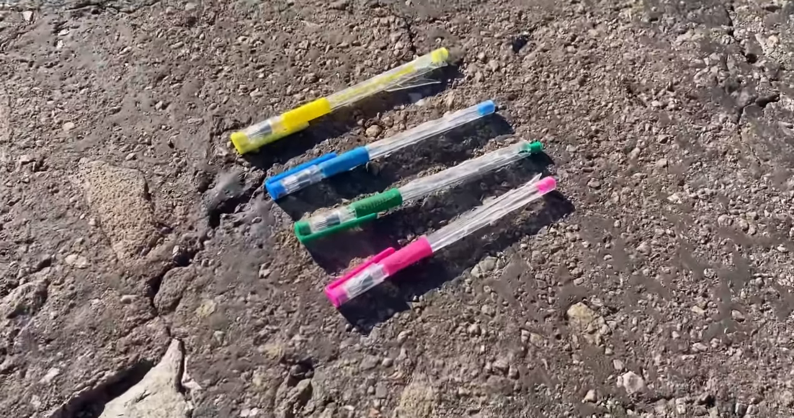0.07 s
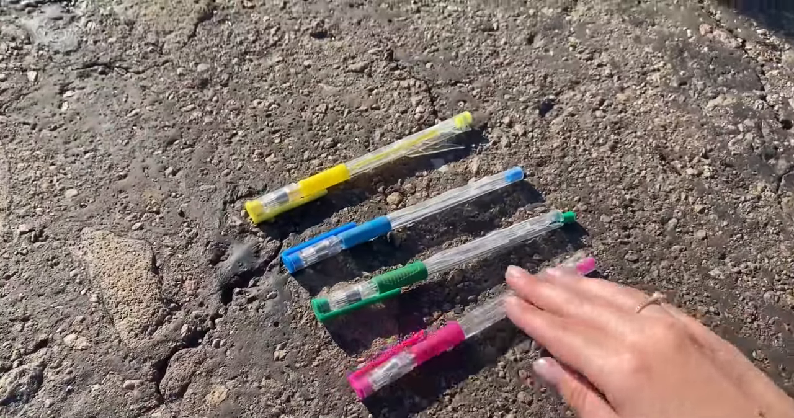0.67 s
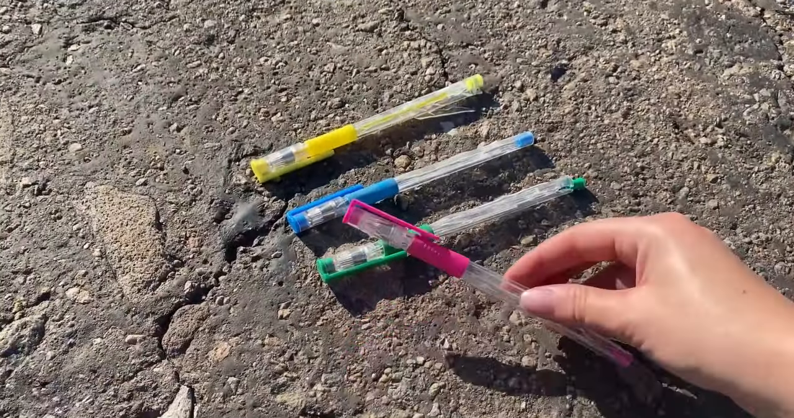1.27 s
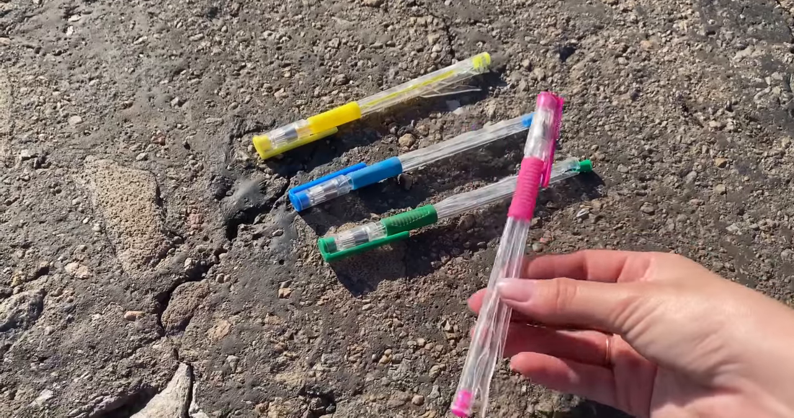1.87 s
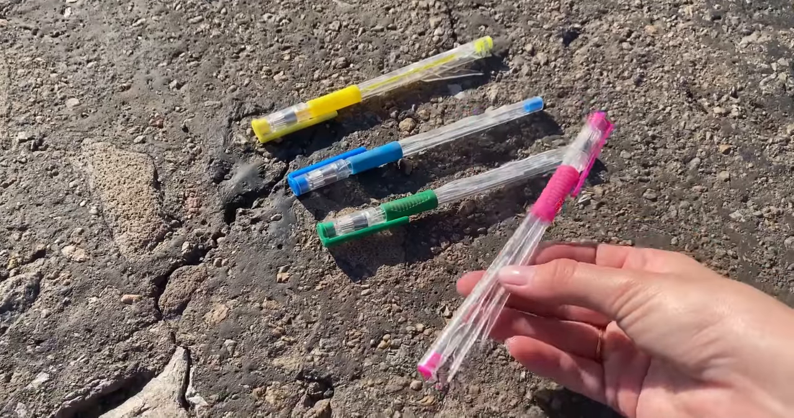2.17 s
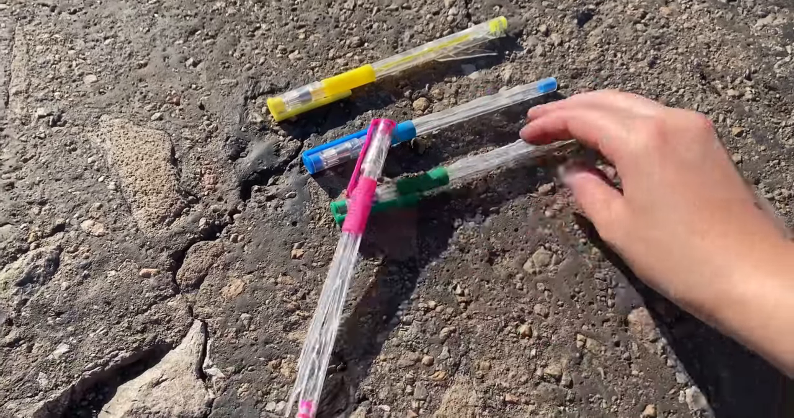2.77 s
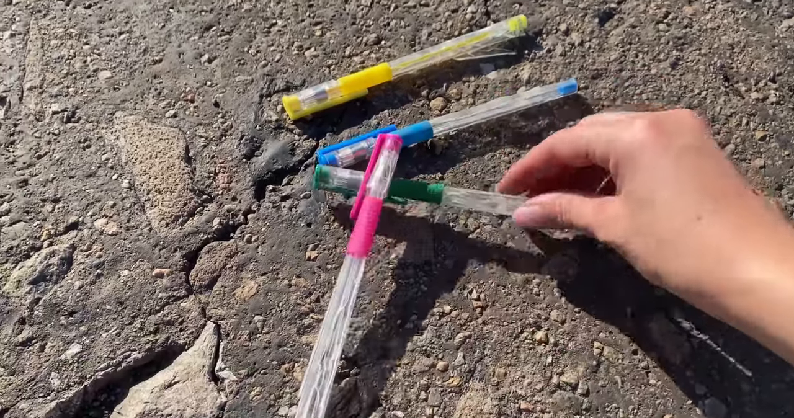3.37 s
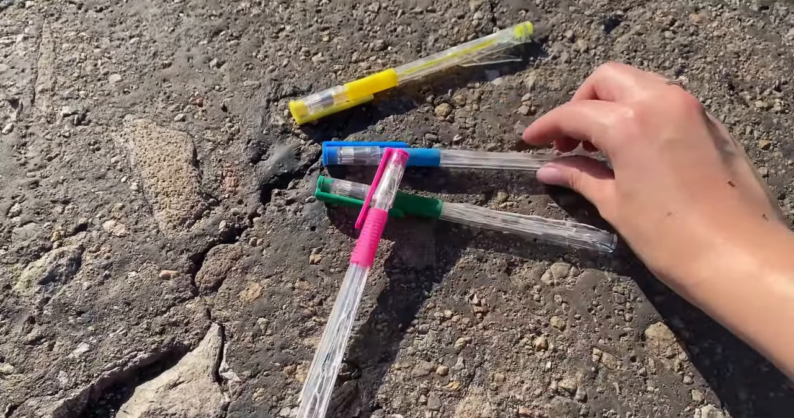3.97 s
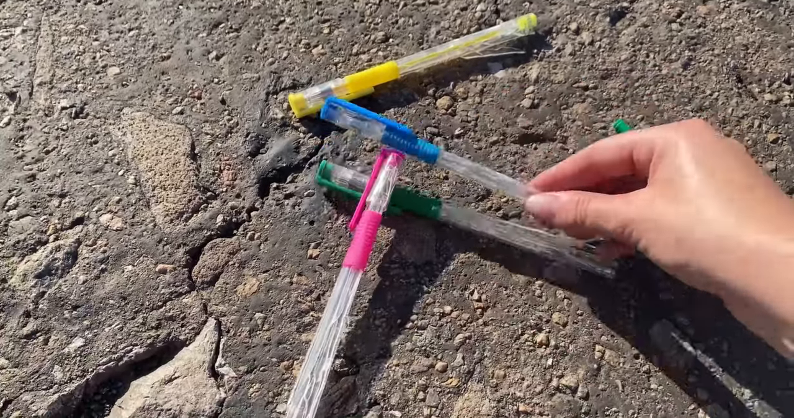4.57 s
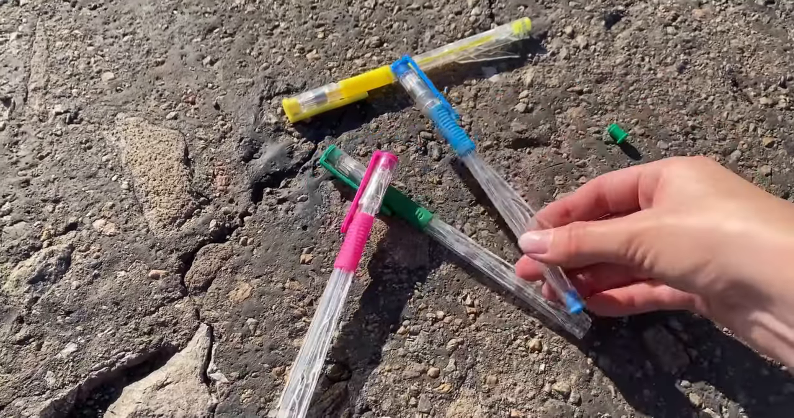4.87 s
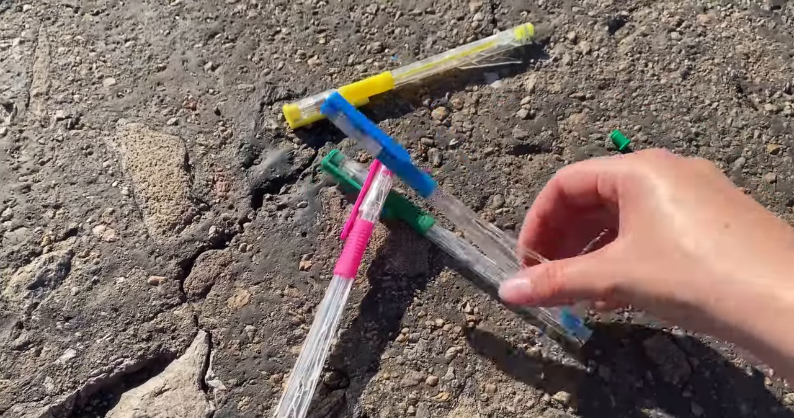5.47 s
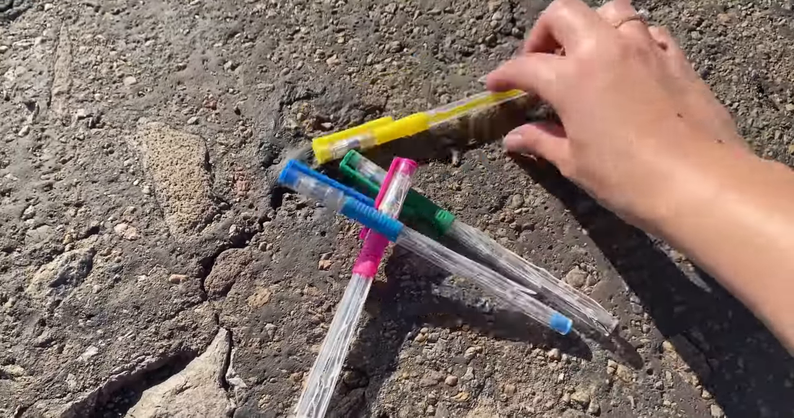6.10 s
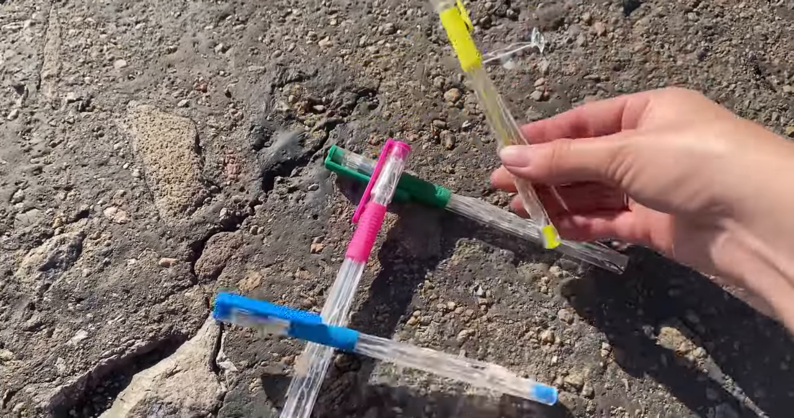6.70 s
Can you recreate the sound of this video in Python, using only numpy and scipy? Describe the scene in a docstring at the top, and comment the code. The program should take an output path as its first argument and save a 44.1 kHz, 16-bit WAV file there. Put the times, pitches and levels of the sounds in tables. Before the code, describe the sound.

Close, hollow ticks and short gritty scrapes of plastic pens being picked up and dropped on pavement outdoors, over a faint breeze.

```python
"""Light wind puffs at a phone's microphone, outdoors, over a distant drone and a thin hiss. Then, close by, a
hand drags, lifts and drops plastic pens on rough asphalt. The hollow barrels tick against grit and each other,
chatter as they catch on grains of stone, ring when let go, and their caps snap shut. The wind is small eddies
of air striking the microphone's openings; the hand holding the phone adds three soft bumps."""
import sys
import numpy as np
from scipy import signal
from scipy.fft import rfft, irfft
from scipy.io import wavfile
from scipy.ndimage import uniform_filter1d

SR = 44100
rng = np.random.default_rng(int(sys.argv[2]) if len(sys.argv) > 2 else 0)


def to_wav(s):
    """Save 16-bit WAV."""
    ch = np.atleast_2d(s).T  # columns
    pcm = np.round(np.clip(ch, -1, 1) * 32767)  # PCM
    wavfile.write(sys.argv[1], SR, pcm.astype(np.int16))


N = 297145
TIME, FREQ = np.arange(N) / SR, np.fft.rfftfreq(N, 1 / SR)


def gain_of(db):
    return 10 ** (np.asarray(db) / 20)


def unit_rms(x):
    return x / np.sqrt(np.mean(x ** 2) + 1e-20)


def unit_energy(x):
    return x / np.sqrt(np.sum(x ** 2, -1, keepdims=True) + 1e-20)


def curve_at(points, hz):
    f, value = np.transpose(points)
    return np.interp(np.log(hz + 1), np.log(f + 1), value)


def add(mix, start, sound):
    part = mix[:, max(round(start * SR), 0):][:, :sound.shape[1]]
    part += sound[:, :part.shape[1]]


def band(x, lo, hi, order=2):
    """Keeps lo to hi Hz; a higher order gives steeper edges."""
    f = np.fft.rfftfreq(x.shape[-1], 1 / SR) + 1
    return irfft(rfft(x) / (1 + (lo / f) ** (2 * order)) / (1 + (f / hi) ** (2 * order)), x.shape[-1])


def stereo_noise(count, likeness):
    a, b = rng.standard_normal((2, count))
    return np.array([a, likeness * a + np.sqrt(1 - likeness ** 2) * b])


def panned(x, left_db):
    return x * gain_of(np.array([[left_db], [-left_db]]) / 2)


def uneven_delays(gap_s, count, jitter=0.25):
    return gap_s * (np.arange(count) + jitter * rng.uniform(-1, 1, count) * (np.arange(count) > 0))


# The wind between gusts: (time [s], relative level [dB], rough lowest pitch [Hz])
BREEZE = [(0, -52, 280), (0.11, -49, 274), (0.165, -74, 350), (0.23, -71, 336), (0.31, -54, 316),
          (0.62, -56, 345), (0.95, -53.5, 263), (1.25, -55.5, 183), (1.6, -55.5, 270), (1.88, -62, 310),
          (2.1, -70.5, 426), (2.53, -77, 346), (2.66, -56, 195), (2.82, -55, 418), (3.3, -62.5, 268),
          (3.47, -63.5, 290), (3.54, -48.5, 290), (3.68, -53.5, 280), (3.76, -68, 280), (3.85, -62, 304),
          (4.6, -56, 231), (5.1, -72, 233), (5.5, -58.5, 166), (5.72, -55, 282), (6.05, -63, 287),
          (6.22, -61, 155), (6.74, -57, 130)]


def breeze(lumpy_db=3.5):
    """Moving air flutters at the microphone as a low, lumpy rumble."""
    lumps = unit_rms(band(rng.standard_normal(N), 9.7, 46))
    rumble = unit_rms(band(stereo_noise(N, 0.78), 63, 720) * gain_of(lumpy_db * lumps))
    times, db, _ = np.transpose(BREEZE)
    return rumble * gain_of(np.interp(TIME, times, db) - 2)


def thin_bass(x, floor_db=-36):
    """Turns the bass down steeply below a pitch that wanders."""
    hz, frame_times, spectra = signal.stft(x, SR, nperseg=2048, noverlap=1792)
    times, _, lowest_hz = np.transpose(BREEZE)
    edge_hz = 0.99 * np.interp(frame_times, times, lowest_hz)
    keep = 1 / (1 + (edge_hz / (hz[:, None] + 1)) ** 18) + gain_of(floor_db)
    return signal.istft(spectra * keep, SR, nperseg=2048, noverlap=1792)[1][:, :N]


# Puffs of wind: (start [s], length [s], relative level [dB], pitch before lowering [Hz])
GUSTS = [(0.02, .02, -47, 500), (0.05, .02, -41, 537), (0.072, .02, -38.5, 604), (0.091, .02, -38.5, 710),
         (0.138, .02, -40, 420), (0.219, .02, -52, 990), (0.254, .02, -48.5, 486), (0.313, .066, -43, 483),
         (0.324, .044, -42, 454), (0.402, .055, -45, 520), (0.473, .02, -39.5, 520),
         (0.501, .088, -45, 453), (0.732, .09, -52.5, 537), (1.247, .02, -44, 398),
         (1.271, .02, -44.5, 402), (1.34, .02, -47.5, 500), (1.593, .02, -40.5, 500),
         (1.709, .033, -48.5, 480), (1.872, .08, -45.5, 605), (2.011, .04, -48.5, 590),
         (2.124, .02, -45, 505), (2.391, .02, -45.5, 516), (2.714, .066, -47, 665), (3.014, .02, -45, 520),
         (3.188, .02, -43.5, 480), (3.512, .066, -43, 523), (3.66, .02, -41, 525), (3.887, .066, -43, 510),
         (4.719, .044, -47.5, 455), (4.821, .066, -48, 495), (4.998, .044, -46.5, 450),
         (5.237, .02, -42, 378), (5.618, .02, -44, 416), (5.765, .02, -46, 447), (5.815, .044, -41, 404),
         (6.273, .066, -48, 300), (6.524, .02, -47, 296)]


def gusts(eddy_s=0.0071, gap_s=0.021, spread_db=2, lowering=0.76):
    """Each gust is one or a few small swirls of air (eddies) striking the microphone."""
    out, t = np.zeros((2, N)), np.arange(-1024, 1024) / SR
    for start, length, db, hz in GUSTS:
        for delay in uneven_delays(gap_s, count=5):
            noise = band(stereo_noise(len(t), 0.047), hz * lowering, hz * lowering)
            eddy = unit_energy(noise * np.exp(-(t / eddy_s) ** 2)) * np.sqrt(eddy_s * SR)
            strength = gain_of(db - spread_db * rng.standard_normal())
            if delay == 0 or delay + gap_s / 2 < length:
                add(out, start + delay + t[0], strength * eddy)
    return out


# The tone colour of the far background: (pitch [Hz], relative level [dB])
AIR_COLOUR = [(200, -29), (380, -1.5), (660, -7), (900, -8), (1190, -15), (1450, -5.5), (1950, -8),
              (2120, -10), (2400, -7), (2920, 0.5), (3150, -3.5), (3450, -3), (4400, -3.5), (6800, -10.5),
              (8000, -23.5), (12000, -29), (15500, -39.5)]
# Pitches that stand out in it: (pitch [Hz], width [Hz], boost [dB])
DRONE_HUMPS = [(339, 37, 3), (778, 40, 8.5), (871, 60, 6), (1056, 39, 6), (1580, 26, 2.5), (1648, 67, 9),
               (1906, 104, 8)]
# Which side it leans to: (pitch [Hz], left over right [dB])
AIR_PAN = [(200, -19), (400, 0.5), (750, 7), (1300, 13), (1900, -1), (2500, 0), (4400, 4), (6500, 1),
           (8500, 25.5)]
# How loud it is: (time [s], relative drone level [dB], relative hiss level [dB])
AIR_LEVEL = [(0, -61, -63), (1.0, -60.5, -62), (2.3, -61, -64.5), (3.1, -59, -63), (5.0, -60, -65.5),
             (6.0, -59, -62.5)]


def distant_drone():
    """Noise from far away: a low drone under a thin hiss."""
    humps_db = sum(db / (1 + (2 * (FREQ - hz) / width) ** 2) for hz, width, db in DRONE_HUMPS)
    sides_db = np.array([[0.5], [-0.5]]) * curve_at(AIR_PAN, FREQ)
    colour = gain_of(curve_at(AIR_COLOUR, FREQ) + humps_db + sides_db)
    air = irfft(rfft(stereo_noise(N, 0.5)) * colour, N)
    drone = band(air, 1, 2290, order=4)
    times, drone_db, hiss_db = np.transpose(AIR_LEVEL)
    drone_gain = gain_of(np.interp(TIME, times, drone_db) + 1) / band(air, 840, 2600, order=4).std()
    hiss_gain = gain_of(np.interp(TIME, times, hiss_db) + 1) / band(air, 2200, 9300, order=4).std()
    return drone * drone_gain + (air - drone) * hiss_gain


def wavering(x, patchy_db=2, dip_db=0.7):
    """Patches of pitch grow louder and softer while the whole sound dips and swells a little."""
    spectra = signal.stft(x, SR, nperseg=512, noverlap=384)[2]
    patches = uniform_filter1d(rng.standard_normal(spectra.shape[1:]), size=7, axis=0)
    patches = unit_rms(uniform_filter1d(patches, size=24, axis=1))
    dips = unit_rms(uniform_filter1d(rng.standard_normal(spectra.shape[2]), size=25))
    spectra *= gain_of(patchy_db * patches - dip_db * dips)
    return signal.istft(spectra, SR, nperseg=512, noverlap=384)[1][:, :N]


# Thin tones in the drone: (pitch [Hz], typical level [dB])
HUM_TONES = [(781, -71), (862, -78.5), (1057, -74.5), (1502, -79), (1661, -71), (1918, -74), (4016, -74.5)]


def hum(waver_db=3, drift_hz=1.78):
    """A few lasting tones from far off, wavering a little on their way."""
    out = np.zeros((2, N))
    for hz, db in HUM_TONES:
        pitch = hz + drift_hz * unit_rms(band(stereo_noise(N, 0), 0.44, 5.08))
        waver = unit_rms(band(rng.standard_normal(N), 0.49, 9.4))
        out += gain_of(db + waver_db * waver) * np.sin(2 * np.pi * np.cumsum(pitch, axis=1) / SR)
    return panned(out, left_db=3)


# The tones of a hollow pen barrel: (pitch [Hz], relative level [dB], time to fade by 60 dB [s])
BARREL_TONES = [(1330, -0.5, 0.06), (2537, 10, 0.083), (3480, 15, 0.063), (4060, -9, 0.13),
                (4110, 10, 0.04), (4800, -6.5, 0.093), (5500, -1, 0.028), (6600, 11.5, 0.059),
                (9030, 24, 0.027), (9940, 23, 0.012), (12700, 9.5, .025), (14100, 22.5, 0.021)]


def barrel_ring(t, vary_db=4, detune=0.028):
    """The barrel rings with a new mix of tones each time, as where it is touched and held varies."""
    hz, db, fade_s = np.transpose(BARREL_TONES)[:, :, None]
    hz = hz * (1 + detune * rng.uniform(-1.39, 1, hz.shape))
    db = db + vary_db * rng.standard_normal(db.shape)
    phase = 2 * np.pi * (rng.random(hz.shape) + 0.72 * rng.random((2,) + hz.shape))
    tones = gain_of(db - 60 * t / fade_s) * np.sin(2 * np.pi * hz * t + phase)
    return unit_energy(tones.sum(1))


def barrel_note(t, hz, fade_s, upper_ratio, upper_db):
    """A barrel's main note and one higher tone, dying away together."""
    phase = 2 * np.pi * (rng.random() + 0.96 * rng.random((2, 1)))
    main = np.sin(2 * np.pi * hz * t + phase)
    upper = gain_of(upper_db) * np.sin(2 * np.pi * upper_ratio * hz * t + phase)
    onset = (1 - np.exp(-t * hz / 2)) ** 2
    return unit_energy((main + upper) * onset * gain_of(-60 * t / fade_s))


LEAD_IN_SAMPLES = 256  # a faint, quick swell of noise softens the start of each click


def contact(db, body_db, crack_db, top_hz, ring_db, hz, strike_s=0.00021, scatter_s=0.003):
    """One touch: a faint lead-in, a sharp strike, a scatter off ground and hand, and a plastic ring."""
    t = np.arange(2048) / SR
    strike = unit_energy(stereo_noise(len(t), 0.3) * t * np.exp(-t / strike_s))
    scatter_shape = np.exp(-t / scatter_s) * (1 - np.exp(-t / strike_s))
    scatter = unit_energy(stereo_noise(len(t), 0.04) * scatter_shape)
    hit = unit_energy(strike + gain_of(ring_db) * (scatter + gain_of(-6) * barrel_ring(t)))
    rise = np.exp(-t[:LEAD_IN_SAMPLES][::-1] / 0.001)
    lead_in = gain_of(-15) * unit_energy(stereo_noise(LEAD_IN_SAMPLES, 0.18) * rise)
    hit = np.hstack([lead_in, hit])
    note = barrel_note(t, hz, fade_s=0.013, upper_ratio=2.15, upper_db=-11)
    note = np.pad(note, ((0, 0), (LEAD_IN_SAMPLES, 0)))
    note *= gain_of(-2 + 0.55 * ring_db)  # the freer the barrel rings, the more its note stands out
    body = gain_of(body_db - 1) * unit_energy(band(hit, 850, 4450, order=3))
    clack = unit_energy(unit_energy(band(hit, 3900, 7640, order=5)) + note)
    treble = band(hit, 8250, 16000, order=8)
    crack = gain_of(crack_db) * unit_energy(band(treble, 1, top_hz, order=3))
    return gain_of(db) * np.sqrt(0.004 * SR) * (body + clack + crack)


# Pen knocks: (time [s], level [dB], low body [dB], high crack [dB], top of the crack [Hz],
# ring [dB], barrel note [Hz], bounces [count]). Body, crack and ring are relative levels.
CLICKS = [(0.632, -44.5, -13, -7, 16000, 17, 4100, 0), (0.658, -48.5, -14, -6, 16000, 0, 5840, 0),
          (0.6849, -50, -2, -8, 14000, 4, 3990, 0), (0.6938, -37, -8.5, -8.5, 17000, -1, 3420, 0),
          (0.727, -47, -17, 0, 17000, -6, 6160, 0), (0.733, -46.5, -2, -3, 17000, -5, 3910, 0),
          (0.7516, -46, -9, -1, 16000, -4, 3990, 0), (0.7583, -49, -13, -3, 17000, -1, 3880, 0),
          (0.7678, -50, -8, -2, 16000, -3, 3980, 0), (0.774, -46, -6, -4, 16000, 6, 3900, 0),
          (0.778, -47, -13, -3, 16000, 0, 4110, 0), (0.7889, -42, -14, -2, 16000, -7, 3950, 0),
          (0.807, -41, -11, -5, 17000, 4, 3830, 0), (0.8364, -44, -10, -4, 16000, 4, 4000, 0),
          (0.8468, -43.5, -11, -3, 16000, 0, 4800, 1), (0.877, -44.5, -5, -8, 16000, 8, 4100, 0),
          (0.893, -48, -2, -7, 16000, 3, 3900, 0), (0.9185, -42.5, -8, -10, 16000, 4, 3960, 1),
          (1.0234, -41, -6, -4.5, 16000, 1, 5280, 0), (1.045, -43, -8, -18, 15000, 5, 5050, 0),
          (1.052, -40, -8, -7, 16000, 3, 5020, 2), (1.309, -53, -12, -11, 16000, -1, 4820, 0),
          (1.391, -47.5, -19, 3.5, 18000, -7, 4940, 0), (1.696, -45, -6.5, -11, 13000, 24, 4060, 0),
          (2.3178, -50.5, -6, -15, 14000, 13, 4300, 0), (2.3294, -46, 1.5, 7, 16000, 0, 6370, 0),
          (2.379, -41.5, -10, -4, 17200, 12, 4090, 0), (2.3818, -47.5, -10, -4.5, 17000, 10, 4430, 0),
          (2.406, -52.5, -15, -6, 14100, 8, 5400, 1), (2.4306, -46.5, -7, -5.5, 13000, 9, 4180, 2),
          (2.541, -40.5, -4, 4, 16900, 0, 4100, 0), (2.5448, -38.5, -7, 3.5, 16900, 4, 4040, 2),
          (2.592, -47, -6, -1, 16000, 8, 4770, 0), (2.606, -47, -1.5, -2, 14000, -6, 5400, 0),
          (2.6572, -34, -6.5, 3, 18000, -1, 5300, 0), (2.6625, -42, -13, 5, 18000, 5, 4500, 0),
          (2.667, -40.5, -19, 3, 18000, 13, 4520, 0), (2.678, -46.5, -12, 9, 18000, -9, 4500, 0),
          (2.7139, -45, -12, 7.5, 15000, 6, 4650, 0), (2.716, -46.5, -15, -4, 16000, 6, 4500, 0),
          (2.7238, -45.5, -12, -3, 16000, 9, 4500, 0), (2.734, -53, -17, -1, 14000, 5, 4300, 1),
          (2.7506, -49.5, -16, -5, 14000, 3, 8500, 0), (2.834, -54, 0, 6, 15000, -4, 7300, 0),
          (2.89, -48.5, 3, 9.5, 14900, 1, 4800, 1), (2.901, -48, -2, 5, 13000, 4, 4700, 0),
          (2.922, -47, 1, 5.5, 16000, -2, 4460, 0), (2.951, -52, -3, -5, 14000, 2, 4600, 0),
          (2.988, -56, 2, 7.5, 13000, -8, 6900, 0), (3.0686, -50.5, 2.5, -6, 15000, -2, 4760, 0),
          (3.083, -60, -4, 0, 15000, -3, 4760, 0), (3.2658, -41, -10, -12, 15000, 0, 5930, 0),
          (3.27, -44.5, 0.5, 4, 15000, 3, 4720, 1), (3.2872, -49.5, 0, 1, 14000, 2, 4800, 0),
          (3.408, -48, -18, -1.5, 13000, 10, 3980, 0), (3.46, -48.5, -9, -8, 17000, 5, 5540, 0),
          (3.473, -55, -3, -2, 14000, 2, 5500, 0), (3.48, -57, -4, 8, 17000, 0, 5500, 0),
          (3.539, -60, -9, 9, 17000, 5, 7000, 0), (3.5557, -37, -2, 2, 14000, -4, 4760, 0),
          (3.571, -49.5, -10, 0, 18000, -8, 7340, 0), (3.6063, -48.5, 0, 1.5, 15100, -1, 4050, 0),
          (3.8107, -43, -7, -6, 14000, 15, 3900, 0), (3.818, -37, -5, -11, 13000, 6, 3760, 0),
          (3.834, -47, -15, 4, 13000, 10, 3670, 1), (3.845, -52, 4, 1, 12000, -19, 3960, 0),
          (3.8684, -42.5, -27, -0.5, 11500, 10, 3900, 0), (3.8807, -45.5, -3.5, -5, 11500, 7, 3940, 0),
          (3.902, -42.5, -20, -0.5, 12900, -1, 4040, 0), (3.9212, -52, -4, -5, 12000, -1, 3950, 0),
          (4.026, -62.5, 5, 5.5, 18000, -5, 3900, 0), (4.079, -53.5, -5, -6, 14000, 6, 3900, 0),
          (4.1691, -41.5, -16, -7, 17000, 8, 3900, 0), (4.187, -55, -12, -1, 14000, 2, 3970, 0),
          (4.2191, -55, 5.5, 2, 17000, -11, 4930, 0), (4.387, -47.5, -30, -3.5, 14000, 2, 7800, 0),
          (4.4358, -48, -0.5, 4.5, 12600, -4, 5500, 0), (4.6615, -43, -4, -7, 12000, 2, 6500, 0),
          (4.6755, -57, -14, -1, 15000, 0, 7000, 0), (4.681, -58, -12, -4.5, 15000, 2, 7000, 0),
          (4.8425, -58, -15, 0.5, 15000, -3, 7000, 1), (4.864, -57.5, -10, -3, 15000, 0, 6740, 0),
          (4.943, -61, -12, -1, 16000, 0, 8000, 0), (5.4725, -34, -16, -10.5, 17000, 17, 4650, 0),
          (5.542, -38, -7.5, 4.5, 14000, 2, 6420, 0), (5.5433, -38.5, -9, -1, 14000, 3, 4750, 0),
          (5.5475, -38, -13, 5, 14000, 3, 5080, 0), (5.559, -50, -1, -1, 14000, -2, 4200, 0),
          (5.6116, -54, -10, -3, 14000, 2, 6600, 0), (5.715, -47.5, -5, -10, 14000, 8, 4200, 0),
          (5.7294, -49, -11, -13, 14000, 3, 4200, 0), (5.6871, -31.5, -11.5, -7, 12500, 13, 4150, 0),
          (5.9193, -48, -21, 4, 16000, 11, 6600, 0), (6.0004, -45, -8, 0.5, 18000, 0, 4970, 1),
          (6.0074, -48, -4, 9.5, 17000, 18, 4760, 0), (6.012, -43, -6, -1, 17000, 0, 6360, 0),
          (6.053, -49, -5, -6, 15000, -8, 4720, 0), (6.061, -45, -2, -2, 15000, 5, 4800, 2),
          (6.086, -45.5, -10, 2.5, 16000, 1, 4460, 0), (6.102, -47, -7, -8, 15000, 4, 3540, 0),
          (6.134, -44.5, -14, -12, 15000, 3, 4700, 0), (6.14, -41, -15, -6, 16000, 10, 7300, 0),
          (6.1455, -31.5, -10, -8, 16000, -3, 4600, 0), (6.166, -44, -12, -4, 15000, -9, 5100, 1),
          (6.176, -44.5, -6, -4, 15000, 1, 4500, 1), (6.3698, -59.5, 5.5, 5, 18000, 4, 3340, 0),
          (6.4042, -53.5, -13, 6, 18000, -2, 3630, 0), (6.6055, -54, -11.5, 0, 11000, 5, 7740, 0),
          (6.663, -58, -16, -11, 13000, 25, 10500, 0), (6.6762, -51.5, 0, 2, 13000, 5, 3480, 0),
          (6.6935, -49, -16, -7, 14000, 25, 10500, 0)]


def clicks(bounce_s=0.0048, first_bounce_db=-6, next_bounce_db=-5.5):
    """A pen knocks on stone or another pen; a loose one bounces, softer each time."""
    out = np.zeros((2, N))
    for start, db, *tone, bounces in CLICKS:
        for k, delay in enumerate(uneven_delays(bounce_s, count=4)[:round(bounces) + 1]):
            drop_db = first_bounce_db + next_bounce_db * (k - 1) if k else 0
            add(out, start + delay - LEAD_IN_SAMPLES / SR, contact(db + drop_db, *tone))
    return out


SLIDE_ATTACK_S, SLIDE_RELEASE_S = 0.0064, 0.0078


def slide_gain(t, length, change_db):
    """A slide bites quickly, eases off or grows louder, and stops."""
    bite = np.clip(t / SLIDE_ATTACK_S, 0, 1)
    stop = np.exp(-np.maximum(t - length, 0) / SLIDE_RELEASE_S)
    return bite * gain_of(change_db * np.minimum(t / length, 1)) * stop


# The tone colour of scraping on grit: (pitch [Hz], relative level [dB])
GRIT_COLOUR = [(150, -24), (500, -29), (1500, -1), (2500, -6.5), (3900, 6.5), (5000, 7), (6300, 7),
               (7200, 1), (10500, -2), (12500, -6), (15500, -14.5)]
# Pen drags: (start [s], length [s], level [dB], change by the end [dB], snags over level [dB],
# barrel note [Hz], relative note level [dB], higher tone over note [dB])
SLIDES = [(0.694, 0.28, -44, -12, -7, 3850, -1, -7), (1.01, 0.053, -61.5, 10, 1, 4000, 10, -6),
          (2.41, 0.028, -56, -3, 1, 4500, 3, -3), (2.538, 0.012, -38.5, -7.5, -12, 3960, -13, 4),
          (2.665, 0.12, -75, 9, 5, 4500, -2, -4), (2.896, 0.074, -67, 3, -1, 4600, -13, 0),
          (3.275, 0.016, -47.5, -4, -15, 4470, -14, -5), (3.451, 0.22, -63.5, -13, 4, 4600, -10, -6),
          (3.816, 0.18, -47.5, -14, -12, 3890, 6, 4), (4.45, 0.11, -59.5, -1.5, -3, 5730, -30, -4.5),
          (5.035, 0.015, -49.5, -6.5, -25, 5970, -3, -4), (5.495, 0.13, -60, -3.5, 4, 4830, -21, -0.5),
          (5.704, 0.036, -61.5, 1.5, -5.5, 4230, -5, 0), (5.998, 0.19, -51, -1, -8, 4800, -11, 2),
          (6.201, 0.088, -58, -4, -1, 4800, -14, 6), (6.724, 0.012, -58.5, 1, 1, 4000, 0, 4)]


def slides(catches_per_s=1300, spread_db=5.5, grain_kinds=8, size=16384):
    """A sliding pen catches on grains of stone; each catch rings the barrel."""
    out, t = np.zeros((2, N)), np.arange(1500) / SR
    colour = gain_of(curve_at(GRIT_COLOUR, np.fft.rfftfreq(size, 1 / SR)))
    for start, length, db, change_db, _, hz, note_db, upper_db in SLIDES:
        rasp = np.zeros((2, size))
        for _ in range(grain_kinds):
            caught = rng.random(size) < catches_per_s / grain_kinds / SR
            catches = caught * gain_of(spread_db * np.minimum(rng.exponential(1, size), 3))
            tick = unit_energy(stereo_noise(len(t), 0.29) * np.exp(-t / 0.00039))
            ring = gain_of(-4) * barrel_ring(t)
            note_hz = hz * rng.uniform(0.92, 1.04)
            note = barrel_note(t, note_hz, fade_s=0.008, upper_ratio=2.66, upper_db=upper_db)
            grain = unit_energy(tick + ring + gain_of(note_db) * note)
            add(rasp, 0, signal.oaconvolve(catches[None], grain, axes=1))
        rasp = unit_rms(irfft(rfft(rasp) * colour))
        add(out, start, rasp * gain_of(db) * slide_gain(np.arange(size) / SR, length, change_db))
    return out


def snags(per_s=42, spread_db=7):
    """During those slides the pen trips on larger stones and ticks."""
    out = np.zeros((2, N))
    for start, length, db, change_db, snag_db, hz, _, _ in SLIDES:
        for delay in SLIDE_ATTACK_S + uneven_delays(1 / per_s, count=13, jitter=0.63):
            tick_db = db + snag_db + spread_db * rng.uniform(-1, 1)
            tick = contact(tick_db, body_db=-8.5, crack_db=-0.5, top_hz=18000, ring_db=2, hz=hz)
            if delay < length:
                tick *= slide_gain(delay, length, change_db)
                add(out, start + delay - LEAD_IN_SAMPLES / SR, tick)
    return out


# Soft bumps on the phone: (time [s], level [dB])
BUMPS = [(1.615, -78), (3.0, -83), (5.21, -61.5)]


def hand_bumps(hz=57, width_s=0.017):
    """The hand holding the phone nudges it, making a brief wobble of bass."""
    out = np.zeros(N)
    for time, db in BUMPS:
        t = TIME - time
        out += gain_of(db) * np.exp(-(t / width_s) ** 2) * np.sin(2 * np.pi * hz * t)
    return out


# Pens being let go: (time [s], peak level [dB], note [Hz], time to fade by 60 dB [s])
PINGS = [(2.380, -52, 4200, .04), (2.6575, -35, 3600, .018), (2.659, -43, 4400, .08),
         (2.715, -52, 4350, .06), (3.8185, -42, 3800, .05), (4.7283, -36, 3270, .02),
         (5.472, -41, 4770, .024), (5.543, -41, 4600, .025), (5.6885, -43, 4200, .028)]


def pings(second_ratio=1.5, second_db=-7):
    """A freed barrel rings on with two notes, each with a weak higher tone."""
    out, t = np.zeros((2, N)), np.arange(6000) / SR
    for start, db, hz, fade_s in PINGS:
        first = barrel_note(t, hz, fade_s, upper_ratio=2.27, upper_db=-10)
        second = barrel_note(t, hz * second_ratio, fade_s, upper_ratio=2.27, upper_db=-10)
        ring = first + gain_of(second_db) * second
        add(out, start, gain_of(db) * ring / abs(ring).max())
    return out


def sharp_pulse(colour, size=1024):
    """The shortest pulse with this tone colour: it starts at once and dies away."""
    log_gain = np.log(np.maximum(np.r_[colour, colour[-2:0:-1]], 1e-4))
    return np.fft.ifft(np.exp(np.conj(signal.hilbert(log_gain)))).real[:size]


# Sharp snaps: (time [s], body [dB], clack [Hz], clack [dB], crack [Hz], crack [dB], treble [dB])
SNAPS = [(4.6537, -14, 5600, -1, 9960, 11.5, -3), (4.7279, -2.5, 4460, -0.5, 10050, 6.5, 2),
         (4.9078, -20, 6260, -5.5, 10600, -7, -8), (6.5727, -33, 7200, -3, 9900, -4.5, -22),
         (6.6458, -23, 6060, 5, 10700, -3.5, -13)]


def snaps(body_hz=1150, treble_hz=14600, width_hz=1620, lowest_hz=650, echo_s=0.00038):
    """A pen cap snaps shut: one clean pulse, its echo off the ground and a short scatter."""
    out, t, f = np.zeros((2, N)), np.arange(1024) / SR, np.fft.rfftfreq(2048, 1 / SR)
    arrival = np.array([2, 0])  # the left side hears it two samples late
    for start, body_db, clack_hz, clack_db, crack_hz, crack_db, treble_db in SNAPS:
        humps = [(body_hz, body_db), (clack_hz, clack_db), (crack_hz, crack_db), (treble_hz, treble_db)]
        power = sum((gain_of(db) / (1 + ((f - hz) / width_hz) ** 2)) ** 2 for hz, db in humps)
        colour = np.sqrt(power) / (1 + (lowest_hz / (f + 1)) ** 6)
        paths = gain_of(-5) * unit_energy(stereo_noise(len(t), 0.31) * np.exp(-t / 0.0025))  # scatter
        paths[(0, 1), arrival] += 1  # straight to the phone
        paths[(0, 1), arrival + round(echo_s * SR)] += gain_of(-6)  # off the ground
        add(out, start, signal.oaconvolve(unit_energy(paths), sharp_pulse(colour)[None], axes=1))
    return out


def reflections(x, fade_s=0.16, level_db=-22):
    """Faint, quick echoes from the person and the street."""
    t = np.arange(8192) / SR
    tail = unit_energy(stereo_noise(len(t), 0) * gain_of(-60 * t / fade_s) * (t > 0.005))
    return gain_of(level_db) * band(signal.oaconvolve(x, tail, axes=1)[:, :N], 300, 10000, order=1)


def scene():
    """Pens close by, wind at the microphone, the drone far off."""
    pens = panned(clicks() + snaps() + pings() + slides() + snags(), left_db=1.2)
    echoes = reflections(pens)
    wind = panned(breeze() + gusts(), left_db=4.5)
    air = thin_bass(wind + wavering(distant_drone()))
    return pens + echoes + air + hum() + hand_bumps()


# How far the wave at the left microphone opening runs ahead of the right: (pitch [Hz], lead [radians])
LEFT_LEAD = [(0, 0), (330, .4), (650, 2.4), (1000, .6), (1250, -.5), (1500, .7), (1950, .8), (2500, 3),
             (3800, 2), (4600, 3.6), (5600, 3), (8000, -1.6), (9300, -3.2), (10900, -6.2), (11500, -6.4),
             (13250, -9.4), (15300, -12.5), (17000, -12.6)]


def record(dry, top_hz=16400):
    """The phone's two sides share one treble, are out of step, and lose the very highest pitches."""
    left, right = rfft(dry)
    shared = np.clip((FREQ - 7200) / 1000, 0, 1)
    right = np.sqrt(1 - shared ** 2) * right + shared * left
    right *= np.exp(-1j * np.interp(FREQ, *np.transpose(LEFT_LEAD)))
    lowpass = signal.firwin(255, top_hz, window=("kaiser", 8), fs=SR)
    return signal.oaconvolve(irfft(np.array([left, right]), N), lowpass[None], "same", axes=1)


dry = scene()
out = record(dry)
to_wav(out)
```